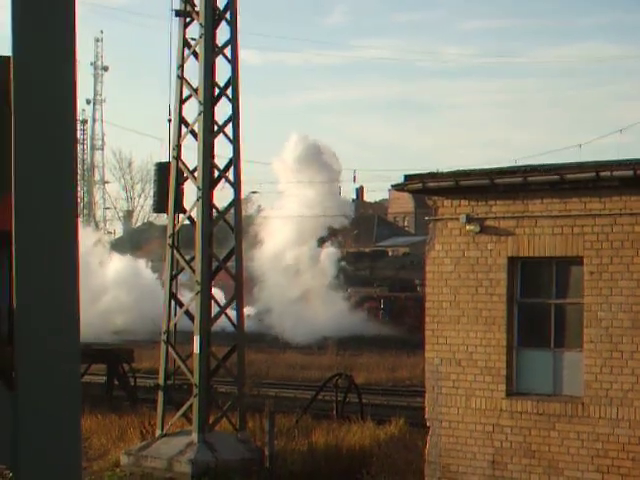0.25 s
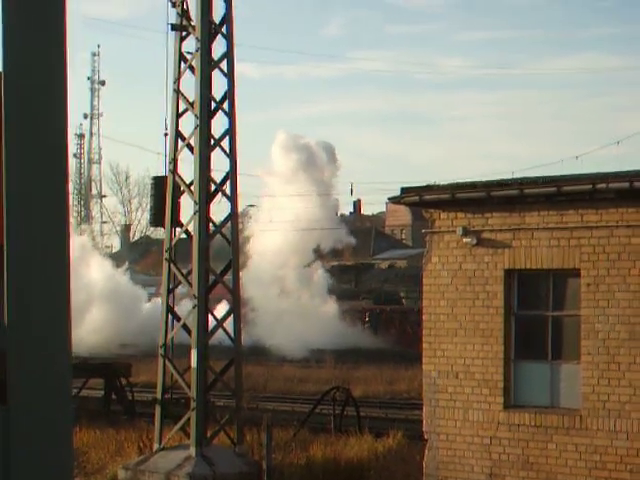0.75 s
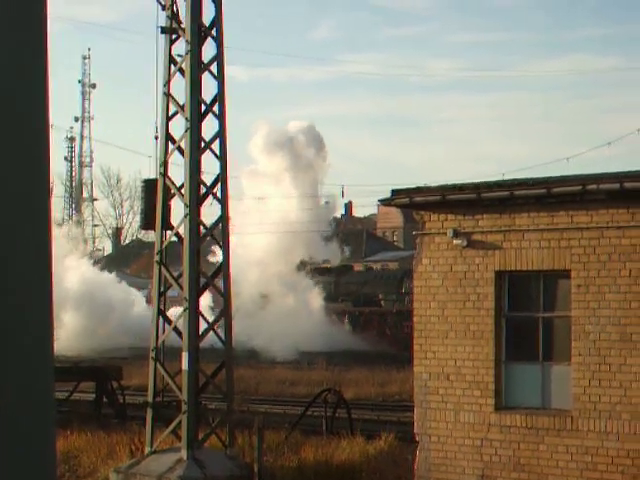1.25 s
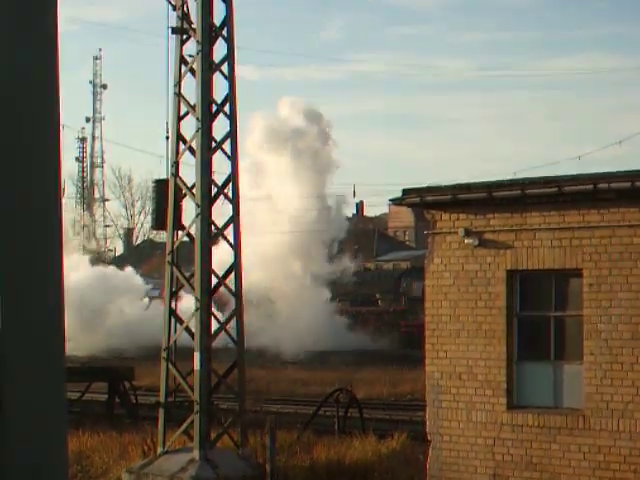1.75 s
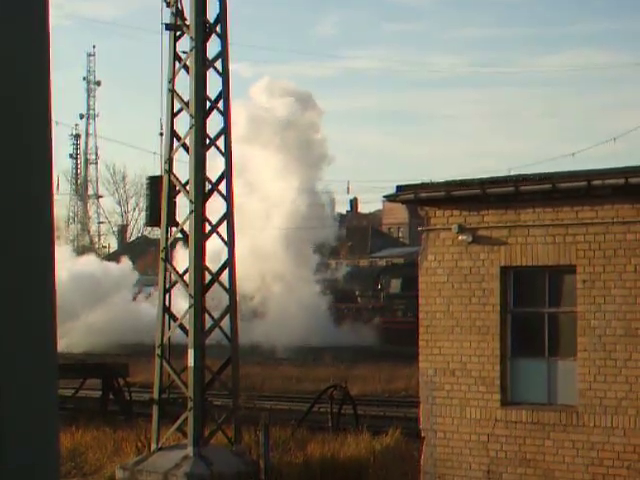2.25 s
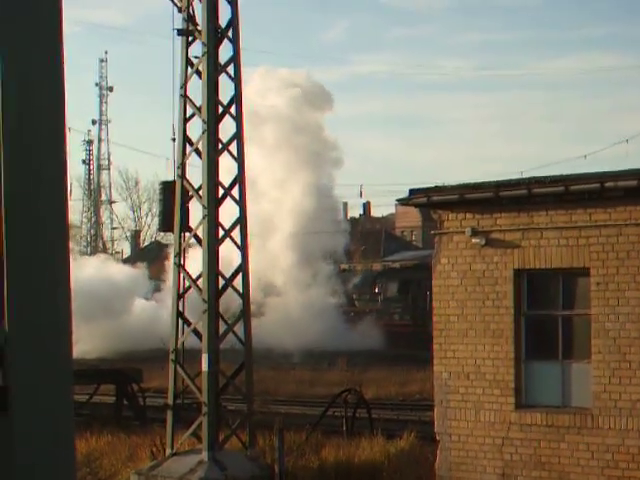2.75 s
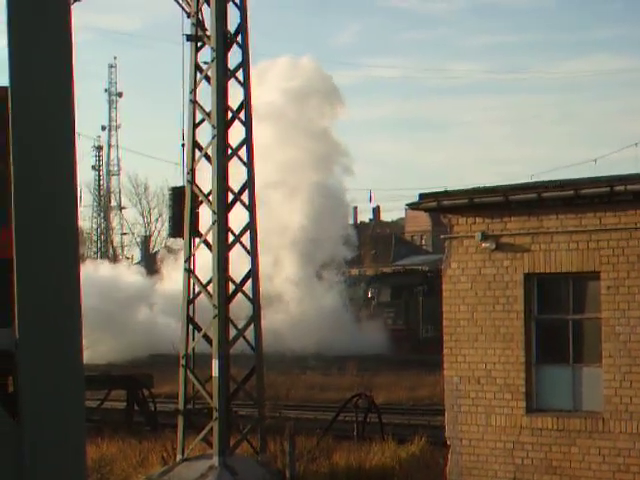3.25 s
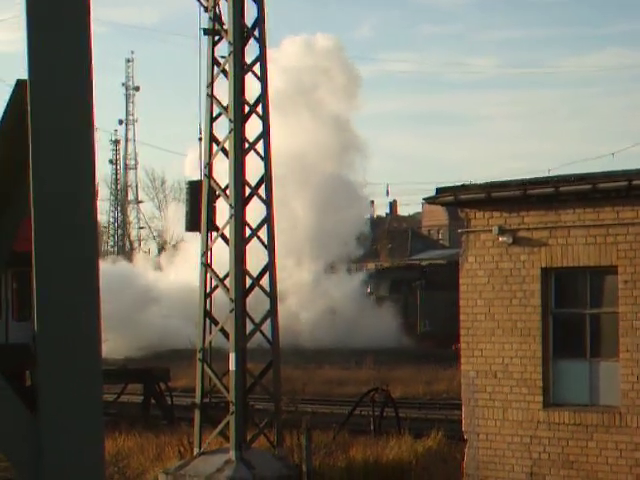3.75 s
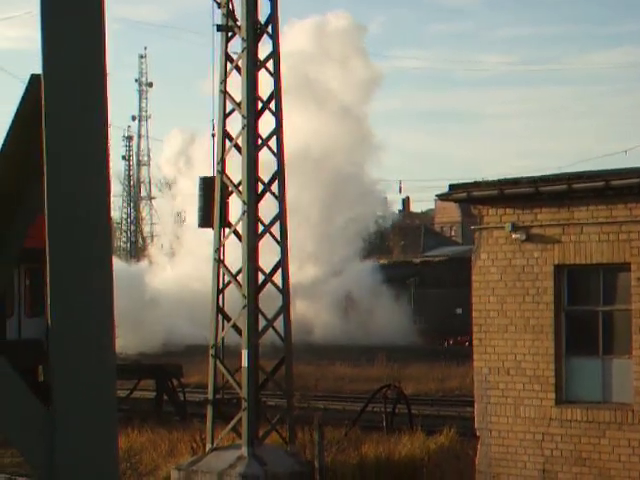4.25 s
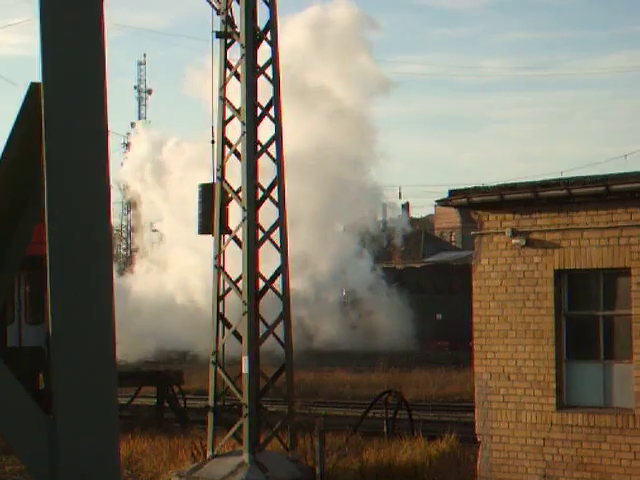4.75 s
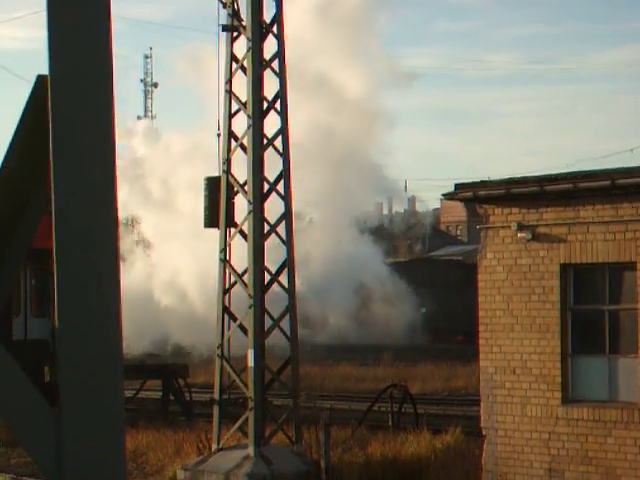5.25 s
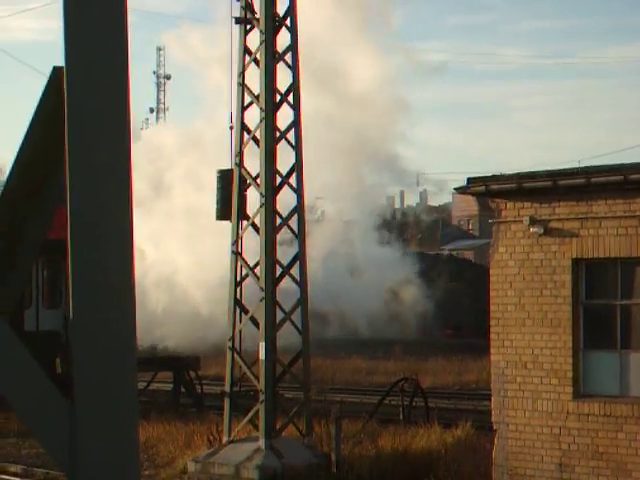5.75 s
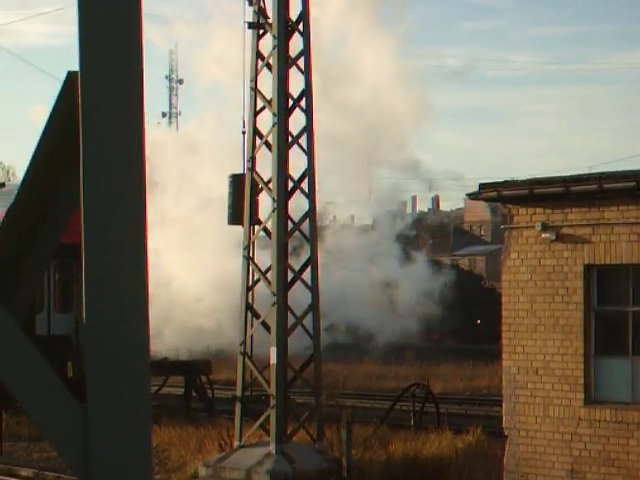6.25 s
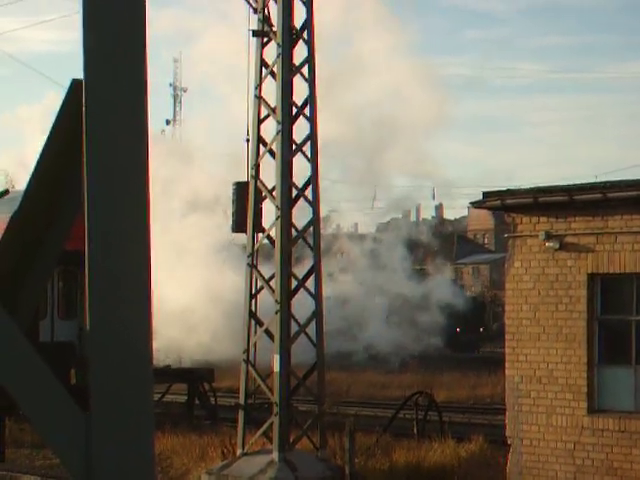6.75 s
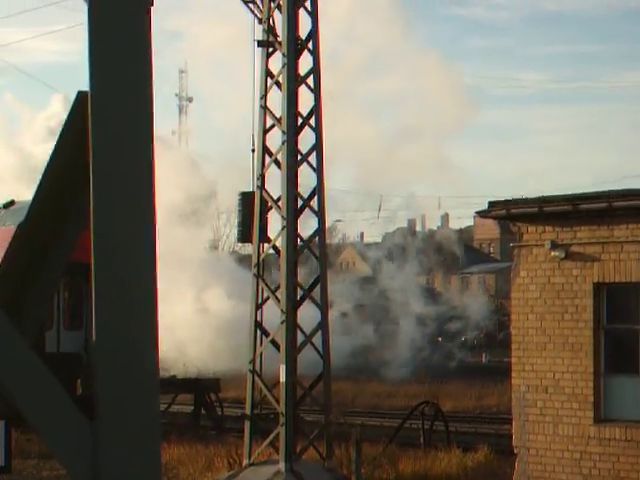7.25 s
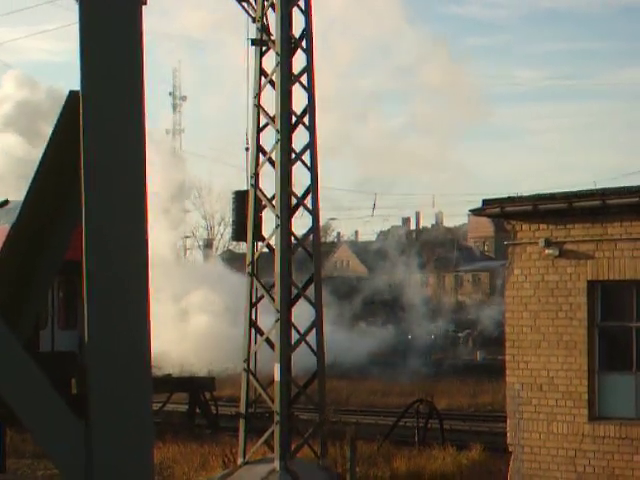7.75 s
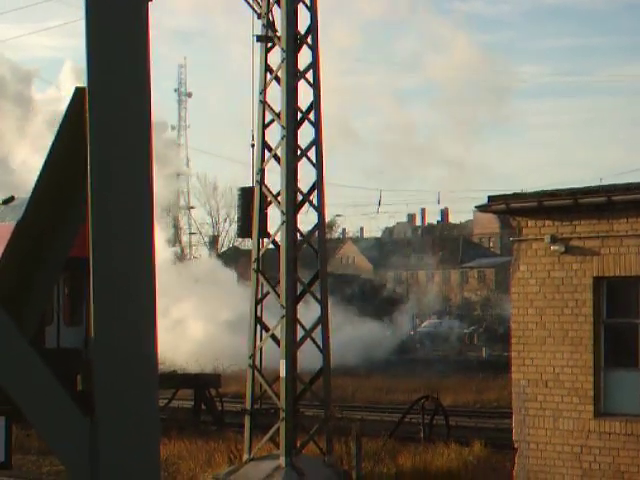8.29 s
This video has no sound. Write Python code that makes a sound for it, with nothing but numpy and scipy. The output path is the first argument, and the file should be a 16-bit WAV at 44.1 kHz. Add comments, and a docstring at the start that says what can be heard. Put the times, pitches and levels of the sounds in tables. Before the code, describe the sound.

Across an open railway yard, a steam locomotive blows a loud, bright hiss with a drifting, phasing colour and a rougher roar beneath. Gusts rumble and pop on a small unprotected microphone from the start. Brief hollow water spits come near the beginning and at three seconds. The hiss drops in steps after four seconds, the wind calms near five, and soft dull engine beats follow under a thin hiss.

```python
"""Across a railway yard, a steam locomotive blows steam from its open drain cocks: loud, shaped noise that hisses,
roars, rasps and sings in a narrow band, while moving air shifts its colour. From the start, gusts rumble and pop on
a small microphone, made from low noise and short pulses. Water spits at about 1.4 and 3.1 s, as ringing noise.
The hiss eases off in steps from about 4 s and the breeze drops near 4.9 s. From 5.6 s the engine beats softly,
in swells of dull noise."""
import sys
import numpy as np
from scipy import signal
from scipy.fft import rfft, irfft, next_fast_len
from scipy.io import wavfile
from scipy.ndimage import map_coordinates

SR = 44100
rng = np.random.default_rng(int(sys.argv[2]) if len(sys.argv) > 2 else 0)


def bounce(signal):
    """Save signal as a 16-bit WAV file at the path given by the first command-line argument."""
    frames = np.transpose(np.atleast_2d(signal))
    limited = np.clip(frames, -1, 1)
    pcm = np.round(limited * 32767).astype(np.int16)
    wavfile.write(sys.argv[1], SR, pcm)


N = 375732  # length in samples, about 8.5 s

CALM_DB = -47.5  # level of the breeze once it has dropped
DROP_S = 4.85  # middle of the drop, in seconds


def amp(db):
    """Turn decibels into a gain."""
    return 10 ** (np.asarray(db) / 20)


def unit(x):
    """Scale a sound to an average strength (rms) of 1."""
    return x / np.sqrt(np.mean(x ** 2) + 1e-20)


def clock():
    """Give the time of every sample in seconds."""
    return np.arange(N) / SR


def curves(rows):
    """Draw straight lines between the rows: one curve for each column after the time."""
    times, *columns = np.transpose(rows)
    return [np.interp(clock(), times, column) for column in columns]


def wobble(rate):
    """Make a smooth random curve through `rate` random points a second."""
    points = rng.standard_normal(int(N * rate / SR) + 4)
    return map_coordinates(points, [clock() * rate])


def filtered(x, response):
    """Multiply each frequency of a sound by response(hz)."""
    size = next_fast_len(N + SR // 2)  # spare room, so that the end does not wrap onto the start
    hz = np.fft.rfftfreq(size, 1 / SR)
    return irfft(rfft(x, size) * response(hz), size)[:N]


def coloured(x, spectrum):
    """Shape a sound by (Hz, dB) points joined on a log frequency axis, then set it to rms 1."""
    points_hz, points_db = np.transpose(spectrum)

    def response(hz):
        return amp(np.interp(np.log(hz + 1), np.log(points_hz), points_db))
    return unit(filtered(x, response))


def resonant(modes):
    """Ring noise in a hollow body with resonances (Hz, width in Hz, dB), at rms 1."""
    def body(hz):
        total = 0
        for k, (centre, width, db) in enumerate(modes):
            ring = 1j * hz * width / (centre * centre - hz * hz + 1j * hz * width)
            total = total + (-1) ** k * amp(db) * ring  # neighbours have opposite signs
        return total
    return unit(filtered(rng.standard_normal(N), body))


def turbulence(patchy_db, patch_hz, patch_s):
    """White noise whose bands fade in and out in patches, as sound does through moving air."""
    hz, t, bands = signal.stft(rng.standard_normal(N), SR, nperseg=1024)
    rows, cols = np.meshgrid(hz / patch_hz, t / patch_s, indexing="ij")
    knots = rng.standard_normal((256, 256))
    patches = map_coordinates(knots, [rows, cols], mode="mirror")
    noise = signal.istft(bands * amp(patchy_db * patches), SR, nperseg=1024)[1][:N]
    return unit(noise)


def crackle(rate, size_db):
    """Sparse tiny shocks of a fast jet, about `rate` a second, each one sample long."""
    happens = rng.random(N) < rate / SR
    return amp(size_db) * happens * rng.uniform(-1.2, 1, N)


def narrow(centre_hz, width_hz):
    """Shift slow noise up to a moving centre pitch, giving a narrow band at rms 1."""
    def slow():
        return filtered(rng.standard_normal(N), lambda hz: 1 / (1 + (2 * hz / width_hz) ** 2) ** 1.2)
    turn = 2 * np.pi * np.cumsum(centre_hz) / SR
    return unit(slow() * np.cos(turn) + slow() * np.sin(turn))


def jet():
    """Hiss and fine spray follow the steam flow, the spray more steeply; they share one flutter and one crackle."""
    # Strength of the steam jet before its flutter. Each row: time in seconds, level in dB.
    flow = [(0, -24), (.85, -24), (.97, -21), (1.2, -26), (1.42, -22), (1.56, -26), (1.75, -21.5),
            (2.8, -23), (3.05, -25), (3.62, -27), (3.77, -22), (4.2, -33), (4.6, -31.5), (4.95, -28),
            (5.27, -31), (6.28, -31), (6.58, -39), (7.6, -38), (8.52, -40)]
    # Colours of the hiss and the spray. Each row: frequency in Hz, relative level in dB per Hz.
    hiss_colour = [(1380, -46), (2350, -13.5), (2920, -1.5), (3270, -3.5), (3540, -0.5), (5110, -4.5),
                   (5600, -10.5), (7280, -36.5), (12300, -120)]
    spray_colour = [(2880, -22.5), (4900, -5), (5490, 0.5), (5950, -0.5), (7090, 0.5), (7640, -4),
                    (8550, -18.5), (8870, -31.5), (11500, -64.5), (19500, -120)]
    full_db = -24  # the flow level at which the two voices have the levels below
    hiss_db, hiss_grows = -26, 0.77  # level in dB, and dB gained for each dB of flow
    spray_db, spray_grows = -26, 1.1

    flow_db = curves(flow)[0] - full_db + 0.45 * wobble(25)
    shocks = crackle(rate=40, size_db=12.5)
    hiss = coloured(turbulence(patchy_db=1.55, patch_hz=202.6, patch_s=0.22) + shocks, hiss_colour)
    spray = coloured(turbulence(patchy_db=2.5, patch_hz=217.9, patch_s=0.18) + shocks, spray_colour)
    return amp(hiss_db + hiss_grows * flow_db) * hiss + amp(spray_db + spray_grows * flow_db) * spray


def surges(width_hz=420):
    """Single bands of the hiss stand out for a moment, giving it a drifting, phasing colour."""
    # Moments when one band blooms. Each row: time in seconds, half length in seconds, centre in Hz, level in dB.
    blooms = [(.15, .25, 5680, -31), (1.366, 0.046, 4940, -27), (1.748, 0.16, 4300, -29),
              (2.133, 0.17, 4120, -26.5), (2.453, 0.19, 5530, -29.5), (2.787, .14, 6600, -28),
              (3.331, .22, 2950, -31.5), (4.979, .15, 4570, -31), (5.979, 0.26, 5770, -36)]
    t, out = clock(), np.zeros(N)
    for s, half, centre_hz, db in blooms:
        near = np.flatnonzero(np.abs(t - s) < 2 * half)
        size = next_fast_len(len(near))
        hz = np.fft.rfftfreq(size, 1 / SR)
        shape = np.exp(-((hz - centre_hz) / width_hz) ** 2)
        noise = rng.standard_normal(size)
        band = unit(irfft(rfft(noise) * shape, size))[:len(near)]
        swell = (1 + np.cos(np.pi * (t[near] - s) / (2 * half))) / 2
        out[near] += amp(db) * swell * band
    return out


def outlet(width_hz=760, waver_db=1.1):
    """The outlet sings a breathy band that wavers in level and drifts in pitch."""
    # The hollow note. Each row: time in seconds, level in dB before the waver, centre in Hz.
    note = [(0, -29.5, 3550), (1.0, -29.5, 3540), (1.6, -41, 3600), (2.9, -45.5, 3520), (3.55, -28, 3540),
            (4.6, -30.5, 3400), (5.5, -47, 3490), (6.9, -43.5, 3500), (7.35, -39, 3348), (8.52, -48, 3500)]
    level_db, centre_hz = curves(note)
    return amp(level_db + waver_db * wobble(9)) * narrow(centre_hz, width_hz)


def plume():
    """Larger eddies downstream in the spreading steam roar, rush and rasp in three broad humps."""
    # Each row: time in seconds, then the levels of roar, rush and rasp in dB before the small lifts below.
    levels = [(0.0, -45.5, -39.5, -33.5), (0.71, -41, -37.5, -35), (1.02, -42, -38.5, -39),
              (2.28, -42.5, -34, -39), (3.92, -39, -36.5, -33.5), (4.27, -38, -38.5, -37),
              (5.2, -35.5, -39.5, -36.5), (6.95, -44.5, -49.5, -45), (7.88, -45, -47, -40.5),
              (8.52, -47.5, -49, -45.5)]
    # Colours of the three voices. Each row: frequency in Hz, relative level in dB per Hz.
    roar_colour = [(220, -36), (380, -18), (450, -10.5), (520, -1), (600, -1), (700, 0.5), (760, 1),
                   (825, -2.5), (905, 2.5), (980, -8), (1070, -9), (1150, -5), (1500, -32), (2500, -100)]
    rush_colour = [(600, -40.5), (1000, -2.5), (1085, -11), (1170, -1), (1250, -2.5), (1335, 2),
                   (1406, 3.5), (1510, -2), (1610, 2.5), (1725, -8.5), (1820, -12), (2340, -29),
                   (4000, -100)]
    rasp_colour = [(1000, -40.5), (1700, -8.5), (1830, -2), (1950, 0), (2060, -1), (2141, 2.5), (2260, -3),
                   (2400, -9.5), (2560, -4), (3300, -30), (5600, -100)]

    def eddies():
        return turbulence(patchy_db=2.0, patch_hz=89.1, patch_s=0.4444)
    roar_db, rush_db, rasp_db = curves(levels)
    roar = amp(roar_db) * coloured(eddies(), roar_colour)
    rush = amp(rush_db + 1.0) * coloured(eddies(), rush_colour)
    rasp = amp(rasp_db + 0.7) * coloured(eddies(), rasp_colour)
    return roar + rush + rasp


def wind_strength():
    """Level of the wind in dB: a breeze that drops away, with bell-shaped gusts on top."""
    # Gusts. Each row: time in seconds, half length in seconds, level in dB.
    gust_rows = [(0.028, 0.14, -36.5), (.85, 0.072, -32), (1.277, 0.027, -29.5), (1.473, .08, -34),
                 (2.12, 0.087, -37), (2.72, .09, -32), (3.616, 0.07, -32), (3.998, 0.035, -21),
                 (4.273, 0.14, -33), (4.617, 0.11, -32), (5.34, 0.031, -34), (8.06, .05, -44)]
    breeze_db, drop_takes_s = -39.5, 0.15  # level while it blows, and how gradual the drop is
    t = clock()
    still_blowing = (1 - np.tanh((t - DROP_S) / drop_takes_s)) / 2  # from 1 down to 0
    breeze = amp(CALM_DB + (breeze_db - CALM_DB) * still_blowing)
    gusts = sum(amp(db) ** 2 * np.exp(-((t - s) / half) ** 2) for s, half, db in gust_rows)
    return 10 * np.log10(breeze ** 2 + gusts)


def wind(flutter_db=-53.0, flutter_grows=0.6):
    """A lumpy rumble follows the wind's strength; a lighter flutter above it grows more slowly."""
    # Colours of the wind. Each row: frequency in Hz, relative level in dB per Hz.
    rumble_colour = [(8, -10.5), (20, 9), (35, 0.5), (70, -2), (110, -9.5), (200, -23), (500, -57),
                     (1500, -110)]
    flutter_colour = [(40, -31), (100, -6.5), (160, 1.5), (250, -1), (400, -5), (600, -13), (2000, -73.5)]
    strength_db = wind_strength() + 2.7 * wobble(14)
    rumble = amp(strength_db) * coloured(rng.standard_normal(N), rumble_colour)
    flutter_level_db = flutter_db + flutter_grows * (strength_db - CALM_DB)
    flutter = amp(flutter_level_db) * coloured(rng.standard_normal(N), flutter_colour)
    return rumble + flutter


def lesser_eddies(scatter_db=3.5, pitch_spread=0.3, count=600):
    """Small eddies arrive at random until the breeze drops, and are stronger in stronger wind."""
    per_second, over_wind_db, typical_hz = 30, 3.5, 116
    chance, spread = rng.random((count, 2)), rng.standard_normal((count, 2))
    s = chance[:, 0] * N / SR
    db = np.interp(s, clock(), wind_strength()) + over_wind_db + scatter_db * spread[:, 0]
    hz = typical_hz * np.exp(pitch_spread * spread[:, 1])
    kept = (chance[:, 1] < per_second * N / SR / count) & (s < DROP_S)
    return list(np.column_stack([s, db, hz])[kept])


def pops(sharpness=1.88, snap_db=-12, level_db=1):
    """Each eddy crossing the port is roughly a suction between two weaker pushes, with a faster snap at its core."""
    # The strongest eddies. Each row: time in seconds, peak in dB before level_db is added, pitch in Hz.
    strong_eddies = [(0.025, -19, 187), (.119, -21.5, 260), (1.28, -21.5, 169), (1.475, -15, 340),
                     (1.483, -13.5, 220), (1.511, -10, 328), (1.538, -15, 220), (2.653, -17, 151),
                     (2.727, -17.5, 170), (2.77, -11.5, 197), (2.857, -20.5, 240), (3.033, -20, 220),
                     (3.56, -22, 111), (3.625, -25, 130), (3.731, -23, 112), (3.983, -13.5, 86),
                     (4.015, -16.5, 240), (4.025, -18, 170), (4.113, -20, 90), (4.253, -21.5, 140),
                     (4.345, -19, 110), (4.56, -21, 140), (4.669, -18, 170), (4.685, -14, 150),
                     (5.328, -16, 150), (5.34, -20.5, 191)]
    t, out = clock(), np.zeros(N)
    for s, db, hz in strong_eddies + lesser_eddies():
        near = slice(*np.searchsorted(t, [s - 0.04, s + 0.04]))
        angle = 2 * np.pi * hz * (t[near] - s)
        push = np.cos(angle + rng.normal(0, 0.58)) / np.cosh(sharpness * angle / 2)
        snap = np.sin(3 * angle) * np.exp(-(angle / 1.8) ** 2)
        out[near] -= amp(db) * (push + amp(snap_db) * snap)  # minus: the middle is a suction
    return amp(level_db) * out


def spits():
    """Slugs of water burst from the pipe in short hollow coughs."""
    # Water spat out with the steam. Each row: time in seconds, level in dB, half length in seconds.
    slugs = [(1.433, -28.5, .012), (3.122, -27.5, 0.016), (3.141, -28.5, .015), (3.193, -18.5, 0.011)]
    # The pipe that it rings. Each row: frequency in Hz, width in Hz, relative level in dB.
    pipe = [(519, 95, -5), (778, 110, 0.5), (905, 89, -1), (1372, 140, -1), (2200, 450, -10.5),
            (2960, 460, -10)]
    t = clock()
    bursts = sum(amp(db) / (1 + ((t - s) / half) ** 2) for s, db, half in slugs)
    return bursts * resonant(pipe)


def beats(rise_s=0.021, fall_s=0.079, scatter_db=3.0, count=9):
    """The engine thuds about three times a second and slowly quickens, each beat a swell of dull noise."""
    # Strength of each beat in turn, in dB before the random scatter.
    beat_db = [-44, -43, -40.5, -45, -53, -44.5, -49, -41.5, -41]
    # The hollow body behind the beats. Each row: frequency in Hz, width in Hz, relative level in dB.
    boiler = [(69.5, 39, -8.5), (168.5, 26, 1), (292, 45, -4.5), (460, 81, -7), (690, 180, -13)]
    start_s, gap_s, quickens_s = 5.6, 0.364, 0.0056  # each gap is shorter than the last by quickens_s
    t, k = clock(), np.arange(count)
    times = start_s + gap_s * k - quickens_s * k * (k - 1) / 2
    levels_db = beat_db + scatter_db * rng.standard_normal(count)
    swell = np.zeros(N)
    for s, db in zip(times, levels_db):
        swell += amp(db) * np.exp(-np.maximum((s - t) / rise_s, (t - s) / fall_s))
    return swell * resonant(boiler)


def scene():
    """Steam, wind and engine reach one microphone, alike in both channels."""
    steam = jet() + surges() + outlet() + plume()
    mono = steam + wind() + pops() + spits() + beats()
    return np.array([mono, mono])


def record(dry):
    """Cut away everything from the band limit upwards."""
    top_hz = 9028
    return np.array([filtered(channel, lambda hz: hz < top_hz) for channel in dry])


dry = scene()
out = record(dry)
bounce(out)
```